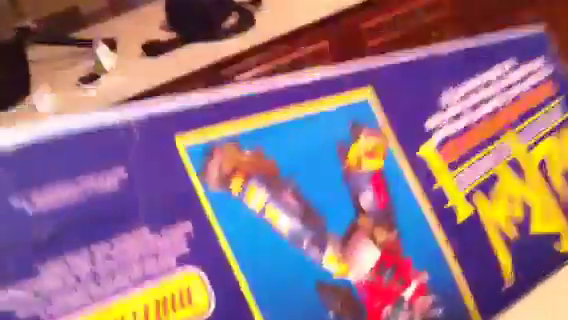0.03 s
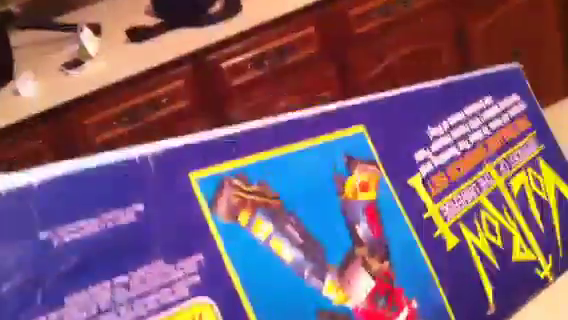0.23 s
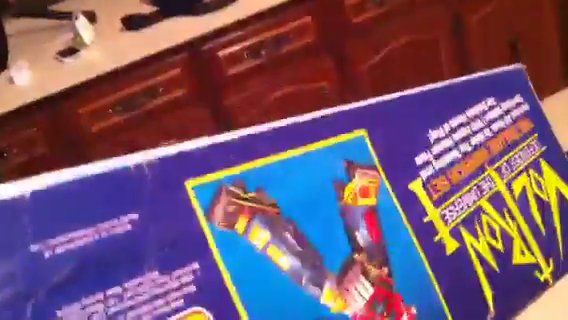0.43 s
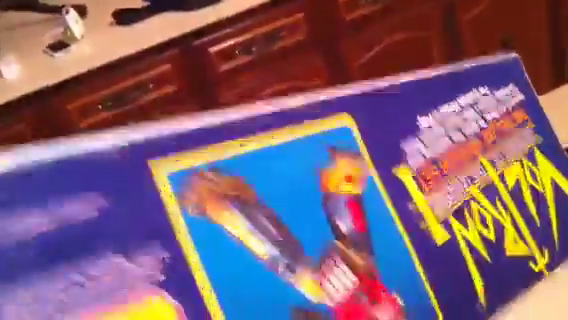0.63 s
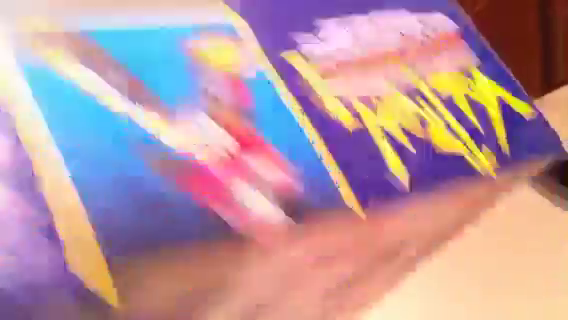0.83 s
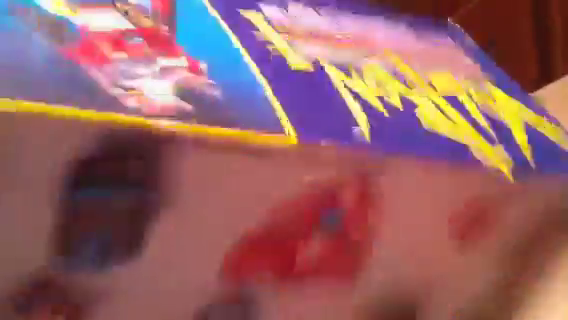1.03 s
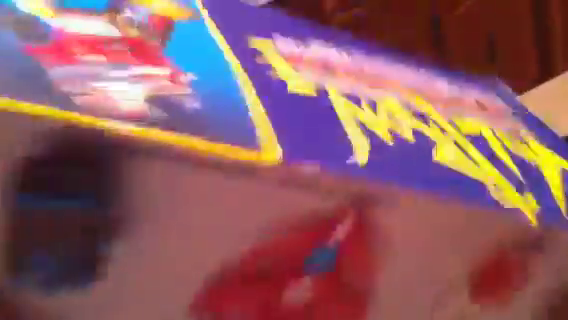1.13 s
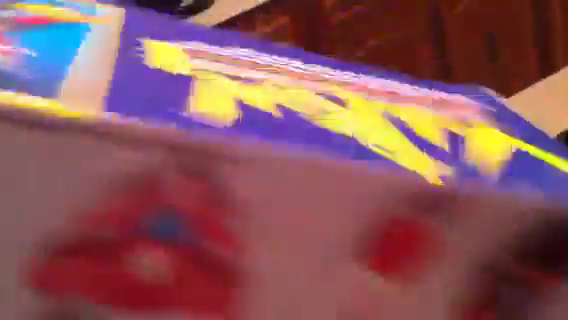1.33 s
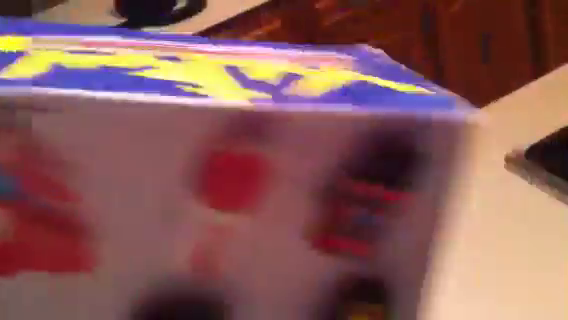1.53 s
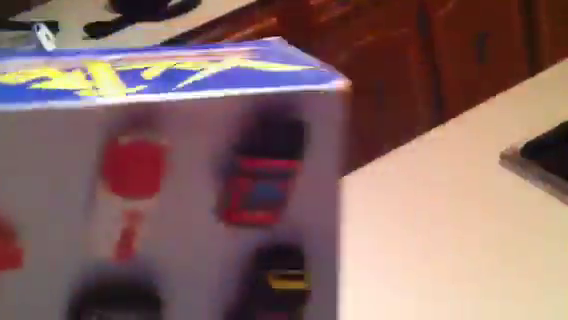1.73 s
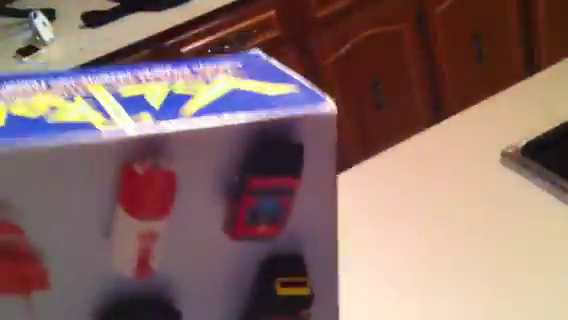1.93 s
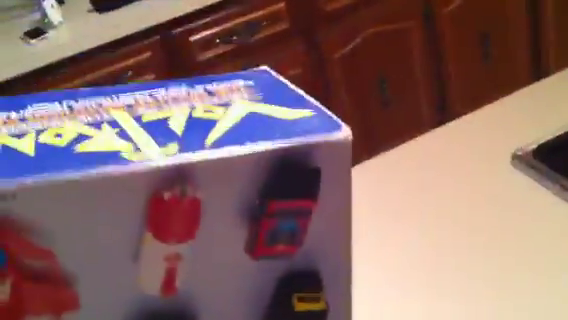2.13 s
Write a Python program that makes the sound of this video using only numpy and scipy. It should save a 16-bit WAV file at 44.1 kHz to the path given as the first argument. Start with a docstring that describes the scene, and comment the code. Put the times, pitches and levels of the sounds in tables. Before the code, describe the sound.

A hollow cardboard box is rubbed, scuffed and knocked as hands turn it on a counter

```python
"""Fingers rub a cardboard box turned over in the hands on a kitchen counter, close to a small microphone:
random slips drive the resonant modes of the box, and finer slips are heard as scratch and hiss.
Two squeaks are stick-slip harmonics; corners and fingertips knock, exciting the box by impulses.
Feedback delays give a faint kitchen echo; an appliance's low rumble is resonant noise in the room tone."""
import sys
import numpy as np
from scipy import signal
from scipy.fft import rfft, irfft, next_fast_len
from scipy.io import wavfile

SR = 44100
rng = np.random.default_rng(int(sys.argv[2]) if len(sys.argv) > 2 else 0)


def log_audio(samples):
    """Write samples as a 16-bit WAV file to the path given in sys.argv[1]."""
    # one column per channel
    frames = np.atleast_2d(samples).T
    # limit to full scale, then quantise
    limited = np.clip(frames, -1, 1)
    pcm = np.round(limited * 32767).astype(np.int16)
    wavfile.write(sys.argv[1], SR, pcm)


def level_to_linear(level):
    """Convert decibel levels to linear amplitude factors, elementwise."""
    exponent = np.asarray(level, float) / 20
    return 10 ** exponent


N = 97020


def rms_one(x):
    """Normalisation: scale a signal to unit rms."""
    return x / np.sqrt(np.mean(x ** 2) + 1e-20)


def in_time(rows):
    """Linear interpolation: table columns become curves with one value per sample."""
    s, *columns = np.transpose(rows)
    return [np.interp(np.arange(N) / SR, s, c) for c in columns]


def drift(rate_hz):
    """Low-passed noise: a random fluctuation of unit rms, slower than about rate_hz."""
    r = np.exp(-2 * np.pi * rate_hz / SR)
    noise = rng.standard_normal(N + SR)
    return rms_one(signal.lfilter([1], [1, -2 * r, r * r], noise)[SR:])


def colour(x, spectrum):
    """Spectral shaping: weight each frequency by a table, interpolated in log frequency; unit rms."""
    hz = np.maximum(np.arange(N // 2 + 1) * SR / N, 1)
    table_hz, table_db = np.transpose(spectrum)
    gain = level_to_linear(np.interp(np.log(hz), np.log(table_hz), table_db))
    return rms_one(irfft(rfft(x) * gain, N))


def ring(x, hz, t60):
    """Damped resonance: a unit impulse starts a decaying sine of initial height about 1."""
    r, w = level_to_linear(-60 / (t60 * SR)), 2 * np.pi * hz / SR
    return signal.lfilter([0, np.sin(w)], [1, -2 * r * np.cos(w), r * r], x + 1e-18)


def without_bass(x):
    """High-pass radiation: the box gives out little below 96.4 Hz."""
    return signal.sosfilt(signal.butter(4, 96.4, "high", fs=SR, output="sos"), x)


# spectrum of the steady room tone: f/Hz, relative level/dB
ROOM = [(24, -82), (40, -47), (109, -15.5), (170, -10.5), (203, -1.5), (800, -22), (1190, -22),
        (1490, -27.5), (15600, -38.5)]
# narrow bands of low rumble: f/Hz, bandwidth/Hz, rms level/dB
HUMS = [(214, 8.7, -72), (235, 6.5, -64)]
ROOM_DB = -58.5   # rms


def room_tone():
    """Filtered noise: a steady broadband floor, plus noise-driven resonances that waver as rumbles."""
    out = colour(rng.standard_normal(N), ROOM) * level_to_linear(ROOM_DB)
    for hz, width_hz, db in HUMS:
        t60 = np.log(1000) / (np.pi * width_hz)   # decay time equivalent to the bandwidth
        rumble = ring(rng.standard_normal(N + SR), hz, t60)[SR:]
        out += level_to_linear(db) * rms_one(rumble)
    return out


KITCHEN_T60_S, KITCHEN_DB, WALL_CUT_HZ = 0.37, -19.5, 10300


def kitchen(x):
    """Reverberation: ten parallel feedback delays, low-passed on every round trip."""
    size = next_fast_len(N + SR)
    z = np.exp(-2j * np.pi * np.arange(size // 2 + 1) / size)   # delay of one sample
    dull = np.exp(-2 * np.pi * WALL_CUT_HZ / SR)
    lags = (rng.uniform(0.013, .04, size=10) * SR).astype(int)
    total = 0
    for k, lag in enumerate(lags):
        decay = level_to_linear(-60 * lag / SR / KITCHEN_T60_S)
        loop = decay * (1 - dull) / (1 - dull * z) * z ** lag
        total = total + (-1) ** k * loop / (1 - loop)
    return irfft(rfft(x, size) * total, size)[:N]


# corners and fingertips knock: t/s, level before modal weighting/dB, favoured f/Hz
KNOCKS = [(0.2115, -21, 590), (0.2156, -28.5, 475), (0.2219, -25, 387), (0.2436, -33, 500),
          (0.296, -36.5, 340), (0.307, -37, 300), (1.204, -14, 1120), (1.2379, -31.5, 307),
          (1.253, -43, 404), (1.26, -43, 353), (1.304, -40.5, 384), (1.756, -42, 764), (1.492, -35, 300),
          (1.5018, -32, 248), (1.611, -47, 228), (1.874, -43, 396), (1.878, -31, 240), (1.986, -40, 500),
          (2.035, -35, 670)]
# modes of the box, driven by knocks and rubbing: f/Hz, relative level/dB, undamped t60/s
BOX = [(157.6, -23.5, 0.25), (205.4, -12, 0.13), (247, -3, 0.048), (341.5, -2, 0.068), (396, -1, 0.068),
       (459, 2, 0.029), (515.5, -4.5, 0.063), (605, -8.5, 0.07), (682, -6.5, 0.027), (827, -6, 0.043),
       (1120, -49, 0.015)]
KNOCK_WIDTH_OCT, KNOCK_DAMPING = 0.15, 0.9   # spread of modes struck; share of t60 left under the hand
CONTACT_MS = .7   # approximate length of the contact pulse


def knocks():
    """Modal excitation: an impulse drives most strongly the modes near its favoured pitch."""
    out = np.zeros(N)
    chance_db = rng.normal(0, 1.5, (len(KNOCKS), len(BOX)))
    s, db, favoured_hz = np.transpose(KNOCKS)
    for k, (hz, mode_db, t60) in enumerate(BOX):
        octaves_off = np.log2(hz / favoured_hz)
        nearness = np.exp(-.5 * (octaves_off / KNOCK_WIDTH_OCT) ** 2)
        clicks = np.zeros(N)
        clicks[(s * SR).astype(int)] = level_to_linear(db + chance_db[:, k] - 3) * nearness
        # knocks feel only half the modal level differences
        out += level_to_linear(.5 * mode_db) * ring(clicks, hz, KNOCK_DAMPING * t60)
    soft = np.hanning(int(CONTACT_MS * SR / 1000) + 3)
    return without_bass(np.convolve(out, soft / soft.sum())[:N])


# skin sticks and slips on glossy card, one table per squeak: t/s, slip rate f/Hz, nominal level/dB
SQUEAKS = [
    [(.092, 1400, -72), (.099, 1530, -63), (.103, 1200, -64), (.11, 1440, -55), (.119, 1650, -55),
     (.126, 1420, -61), (.131, 1150, -63), (.138, 1110, -60), (.143, 1430, -62), (.149, 1800, -50),
     (.155, 1650, -64), (.159, 1350, -53), (.164, 1600, -52), (.169, 1650, -72)],
    [(1.392, 3550, -72), (1.398, 3900, -54), (1.402, 4250, -52), (1.408, 4640, -55), (1.429, 4740, -53),
     (1.435, 5200, -46), (1.441, 5800, -47), (1.449, 7250, -50), (1.454, 7600, -72)],
]
# per squeak, relative level/dB of multiples 1, 2, .. of the slip rate
SQUEAK_PARTIALS_DB = [
    [0, -5, -10, -8],
    [0, 0, -9],
]
# per squeak, rms jitter as a share of the slip rate
SQUEAK_JITTER = [.022, .02]
# per squeak, rms wavering of each partial's level/dB
SQUEAK_WAVER_DB = [2.5, 1.5]
# bands where partials swell or weaken: centre f/Hz, spread/Hz, gain/dB
SQUEAK_BANDS = [(3200, 500, 5), (8300, 700, -14), (14500, 1500, -6)]
# the glossy face rings on after a squeak: f/Hz, resonator gain/dB, t60/s
CARD_RINGS = [(4800, -46, .18), (5400, -47, .15)]


def squeaks():
    """Stick-slip friction: nearly periodic slips give harmonics that waver in pitch and level."""
    out, t = np.zeros(N), np.arange(N) / SR
    settings = zip(SQUEAKS, SQUEAK_PARTIALS_DB, SQUEAK_JITTER, SQUEAK_WAVER_DB)
    for rows, partials, jitter, waver_db in settings:
        hz, db = in_time(rows)
        phase = 2 * np.pi * np.cumsum(hz * (1 + jitter * drift(900))) / SR
        on = (t > rows[0][0]) & (t < rows[-1][0])
        for multiple, partial_db in enumerate(partials, 1):
            partial_hz = multiple * hz
            level_db = db + partial_db + waver_db * drift(100) + 3 * drift(700)
            for centre, spread, gain_db in SQUEAK_BANDS:
                level_db += gain_db * np.exp(-.5 * ((partial_hz - centre) / spread) ** 2)
            audible = on * (partial_hz < .35 * SR)
            out += audible * level_to_linear(level_db) * np.sin(multiple * phase)
    return out + sum(level_to_linear(db) * ring(out, hz, t60) for hz, db, t60 in CARD_RINGS)


# fingers and edges rub or scuff: t/s, hold/s, t60/s, hollow body level/dB, scratch level/dB, hiss level/dB
STROKES = [(0, 0.0023, 0.37, -55.5, -56, -64.5), (0.066, 0.087, 0.67, -82, -60.5, -62),
           (0.208, 0.0047, 0.56, -44, -47.5, -61), (0.2137, 0.0043, 0.029, -44.5, -38.5, -49),
           (0.266, 0.057, 0.25, -54, -56, -73), (0.285, 0.0065, 0.038, -65, -48, -68),
           (0.732, 0.0015, 0.06, -58.5, -55, -70), (0.888, 0.054, 0.2, -54, -61.5, -67.5),
           (0.98, 0.066, 0.45, -52.5, -61, -66), (1.074, 0.083, 0.37, -47.5, -55.5, -67.5),
           (1.115, 0.0092, 0.026, -53, -51, -55.5), (1.204, 0.0015, 0.024, -74, -56, -54),
           (1.23, 0.02, 0.11, -51, -52.5, -57.5), (1.279, 0.028, 0.22, -54.5, -58.5, -65.5),
           (1.319, 0.21, 0.16, -55, -59, -60.5), (1.465, 0.044, 0.21, -43.5, -50, -56.5),
           (1.509, 0.0094, 0.044, -63, -53, -52), (1.52, 0.056, 0.27, -57, -55.5, -67),
           (1.587, 0.0092, 0.072, -45, -54, -54.5), (1.616, 0.013, 0.74, -62, -60.5, -68),
           (1.735, 0.015, 0.67, -60, -60, -69), (1.873, 0.0053, 0.05, -46, -53, -54),
           (1.909, 0.012, 0.22, -60, -61, -64), (1.928, 0.041, .15, -56, -55, -60),
           (1.98, 0.025, 0.13, -80, -52.5, -52.5), (2.03, 0.0043, 0.53, -60, -59, -68)]
RISE_S, RISE_SHARE = 0.00036, 0.41   # rise time, plus this share of the hold


def stroke_levels():
    """Power summation: strokes rise, hold and decay exponentially; overlaps add in power per layer."""
    t, power = np.arange(N) / SR, np.zeros((3, N))
    for s, hold, t60, *db in STROKES:
        rise = np.clip((t - s) / (RISE_S + RISE_SHARE * hold), 0, 1)
        decay = level_to_linear(-60 * np.maximum(t - s - hold, 0) / t60)
        power += (level_to_linear(np.array(db))[:, None] * rise * decay) ** 2
    return np.sqrt(power)


GRAINS_PER_S, GRAIN_SPREAD_DB = 3000, 2.5   # nominal rate; scale of the uneven sizes


def grains():
    """Random impulse process: dense tiny slips of uneven size and either sign, coming in clumps."""
    sizes = level_to_linear(GRAIN_SPREAD_DB * np.minimum(rng.exponential(1, N), 4)) * rng.choice([-1, 1], N)
    chance = GRAINS_PER_S * level_to_linear(1.5 * drift(40)) / SR
    return sizes * (rng.random(N) < chance)


# spectrum of the scratch layer: f/Hz, relative level/dB
SCRATCH = [(120, -24), (530, -5), (900, 0), (1120, -3.5), (1780, -4.5), (2160, -5.5), (6000, -19.5),
           (8000, -30)]
# spectrum of the rubbing's treble hiss: f/Hz, relative level/dB
HISS = [(2940, -2), (5000, -1.5), (7600, -3), (8050, -6), (11800, -0.5), (15600, -11.5)]
# lifted clear, one side rings more: start t/s, end t/s, f/Hz, relative level/dB, t60/s
FREE_PANEL = (.9, 1.33, 398, -4, .12)
RUB_SOFT_HZ = 1120   # low-pass of the slips that drive the body


def rubbing():
    """Friction-driven resonance: slips excite the box modes; finer ones radiate as scratch and hiss."""
    body, scratch, hiss = stroke_levels()
    soften = signal.butter(2, RUB_SOFT_HZ, fs=SR, output="sos")
    slips = without_bass(body * signal.sosfilt(soften, grains()))
    modes = np.zeros(N)
    for k, (hz, db, t60) in enumerate(BOX):
        modes += (-1) ** k * level_to_linear(db) * ring(slips, hz, t60)   # neighbours in opposite sign
    start, end, panel_hz, panel_db, panel_t60 = FREE_PANEL
    lifted = (np.arange(N) > start * SR) & (np.arange(N) < end * SR)
    modes += level_to_linear(panel_db) * ring(slips * lifted, panel_hz, panel_t60)
    hollow = rms_one(modes) * np.sqrt(np.mean(body ** 2))
    flutter = level_to_linear(1.5 * drift(60))
    # grains mixed with smooth noise
    rough = colour(.6 * rms_one(grains()) + rng.standard_normal(N), SCRATCH)
    treble = colour(.3 * rms_one(grains()) + rng.standard_normal(N), HISS)
    return hollow + flutter * (scratch * rough + hiss * treble)


def scene():
    """Superposition: the box, its kitchen echo and the room tone add."""
    box = rubbing() + knocks() + squeaks()
    return (box + level_to_linear(KITCHEN_DB) * kitchen(box) + room_tone())[None]


def roll_off(x):
    """The treble ends steeply here."""
    return signal.sosfilt(signal.butter(12, 15740, fs=SR, output="sos"), x)


def record(dry):
    """High-pass response: the microphone drops the deep bass below 100 Hz."""
    mix = signal.sosfilt(signal.butter(2, 100, "high", fs=SR, output="sos"), dry)
    return roll_off(mix)


dry = scene()
out = record(dry)
log_audio(out)
```